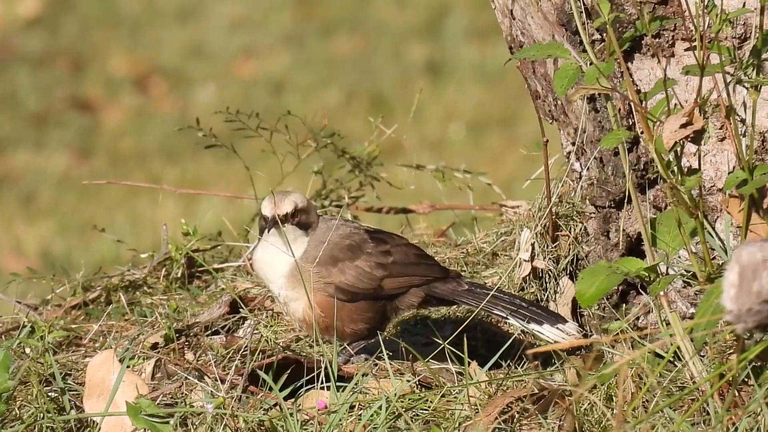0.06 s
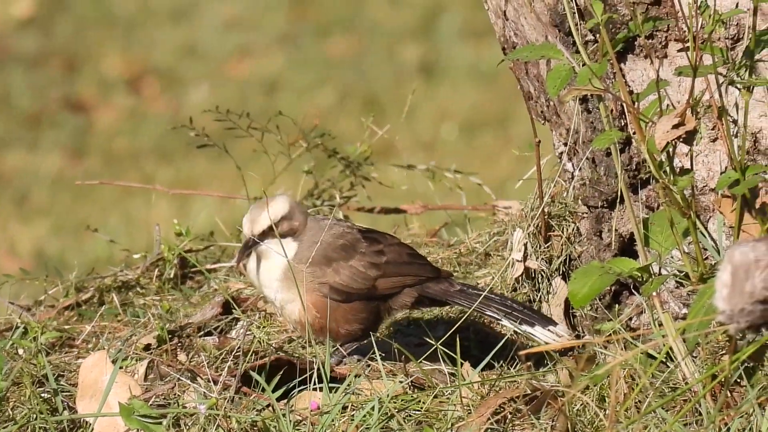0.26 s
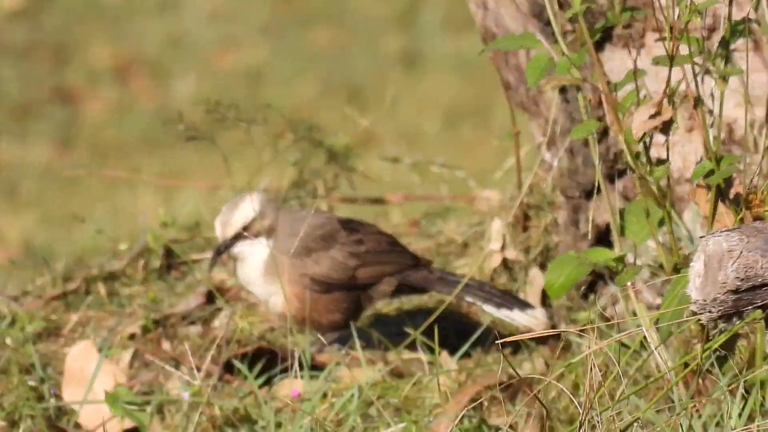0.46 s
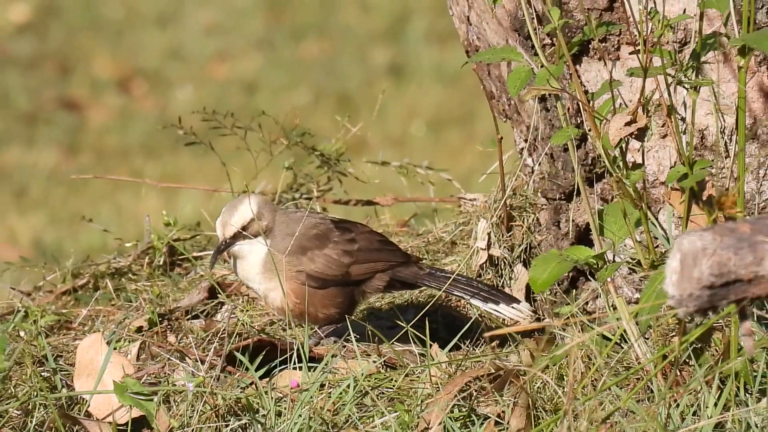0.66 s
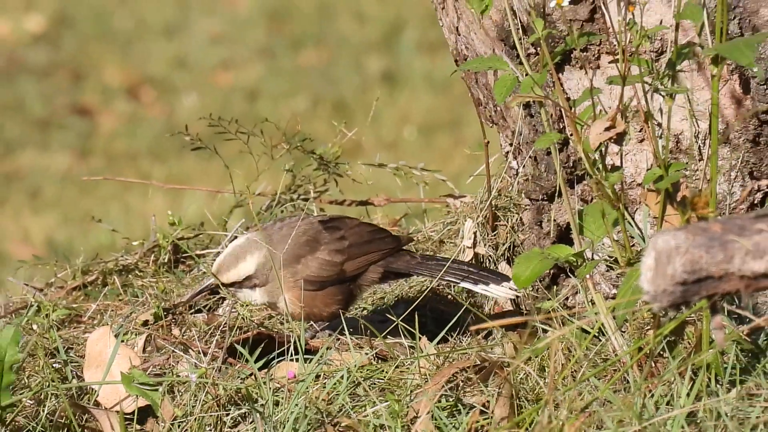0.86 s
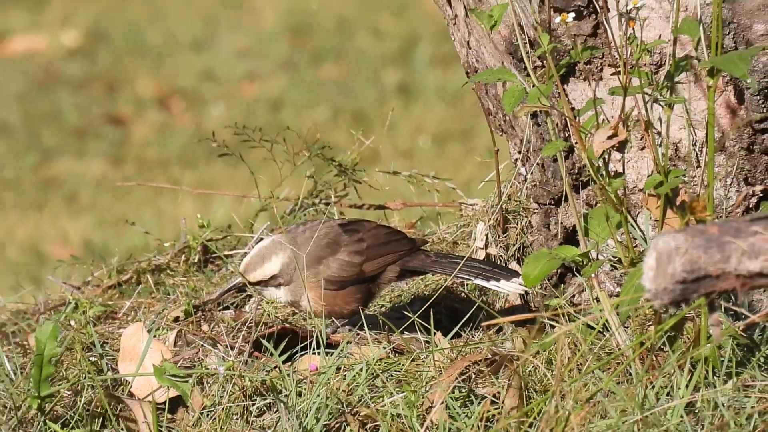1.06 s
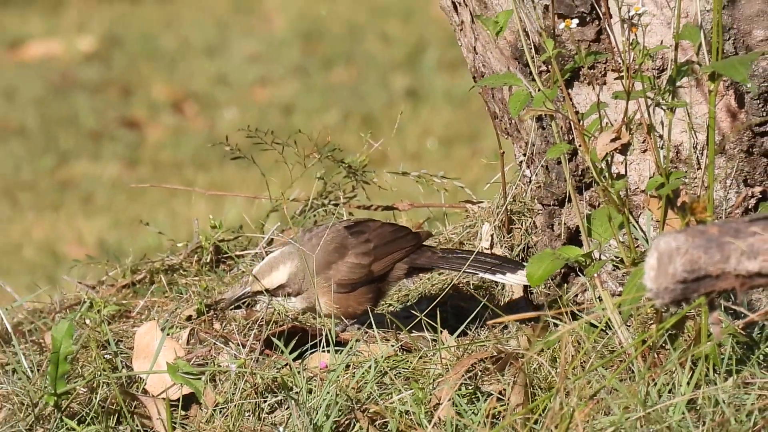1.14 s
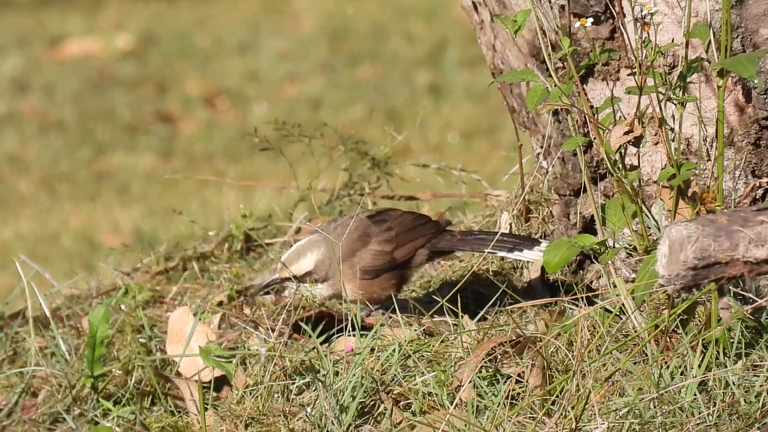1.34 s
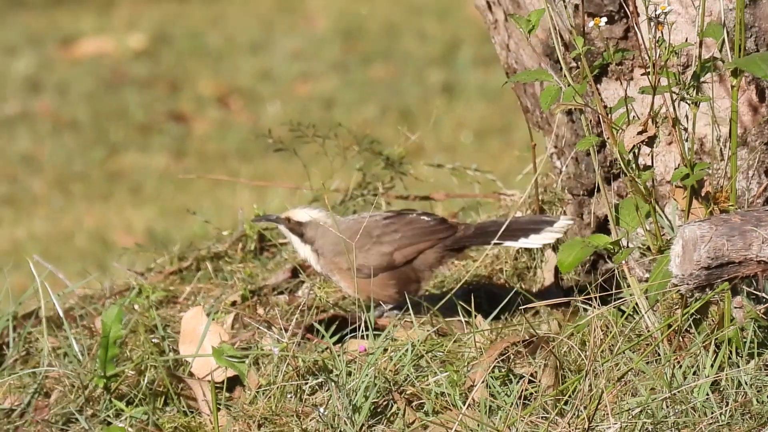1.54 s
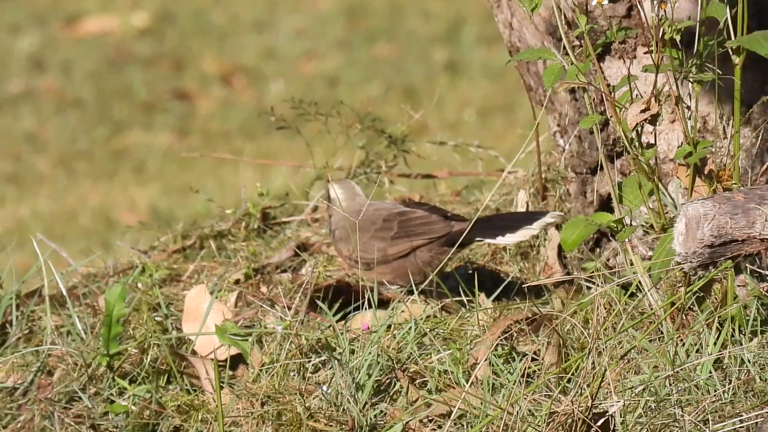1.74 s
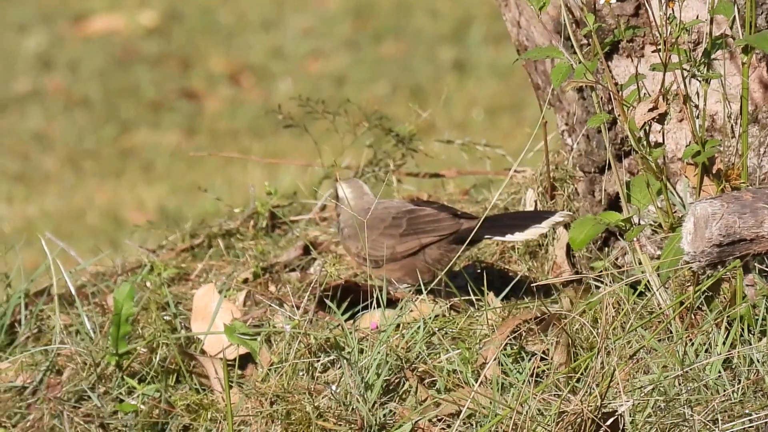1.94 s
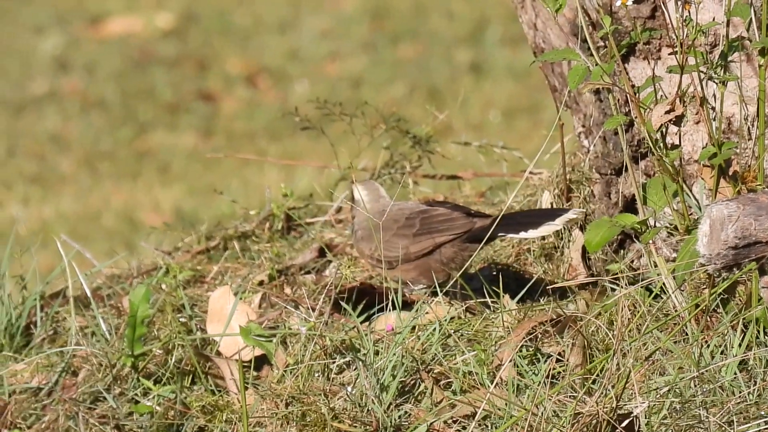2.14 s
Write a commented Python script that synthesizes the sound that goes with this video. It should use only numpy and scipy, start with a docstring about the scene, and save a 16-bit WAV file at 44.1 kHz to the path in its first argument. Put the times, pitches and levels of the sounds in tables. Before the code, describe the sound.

Four shrill two-toned bird calls, each ending in a sharp downward chip, in open grassy surroundings

```python
"""A bird in the grass, to the right of the microphone, gives four piercing calls with both sides of its syrinx:
a high and a low whistle that mix into sum and difference tones, each call ending in a quick downward chip.
The surroundings ring on in scattered noise echoes. Farther birds chirp faintly as short gliding tones and
a far insect buzzes as pulsed band noise, over the shaped-noise drone of distant traffic."""
import sys
import numpy as np
from scipy import signal
from scipy.fft import rfft, irfft, next_fast_len
from scipy.io import wavfile
from scipy.ndimage import map_coordinates

SR = 44100
rng = np.random.default_rng(int(sys.argv[2]) if len(sys.argv) > 2 else 0)


def wrap_up_sound(samples):
    """Save the sound to the file named by the first command line argument, as 16-bit audio."""
    columns = np.atleast_2d(samples).T
    # keep every value between -1 and 1, then stretch to whole-number steps
    tamed = np.clip(columns, -1, 1)
    steps = np.round(tamed * 32767).astype(np.int16)
    wavfile.write(sys.argv[1], SR, steps)


N = 97020
T = np.arange(N) / SR  # time of each sample, s
DULL_HZ = 10000  # treble corner of the echoes and of the chip's rasp


def amp(db):
    """Decibels to amplitude."""
    return 10 ** (np.asarray(db) / 20)


def unit(x):
    """x scaled to an RMS of one."""
    return x / np.sqrt(np.mean(x ** 2) + 1e-20)


def along(points, hz):
    """(Hz, value) points read off on a log frequency axis."""
    f, v = np.transpose(points)
    return np.interp(np.log(hz + 1), np.log(f + 1), v)


def curves(rows):
    """One value per sample for each column after the time."""
    s, *cols = np.transpose(rows)
    return [np.interp(T, s, c) for c in cols]


def wobble(rate):
    """A smooth random curve, rate knots a second."""
    knots = rng.standard_normal(int(N * rate / SR) + 4)
    return map_coordinates(knots, [np.arange(N) * rate / SR])


def filtered(x, response):
    """x times a response of frequency."""
    m = next_fast_len(N + SR // 2)
    return irfft(rfft(x, m) * response(np.fft.rfftfreq(m, 1 / SR)), m)[..., :N]


def gate(start, end, fade):
    """Opens at start, is shut at end; fade in seconds."""
    return np.clip(np.minimum(T - start, end - T) / fade, 0, 1)


def placed(x, pan_db):
    """Mono to stereo by left-right level; the mean of both sides keeps the amplitude."""
    sides = amp(np.array([pan_db / 2, -pan_db / 2]))
    return x * sides / sides.mean(0)


def turn(hz):
    """Running phase of a pitch curve."""
    return 2 * np.pi * np.cumsum(hz) / SR


def echoed(x, tail, db):
    """x (one row) through a stereo echo tail scaled to unit energy on the left, at a level in dB."""
    return amp(db) * signal.fftconvolve(x, tail / np.linalg.norm(tail[0]), axes=1)[:, :N]


def mixed_tones(high_phase, low_phase, since, beat, high_on, both_on):
    """Multiples, sums and differences of the two whistles; each tone wavers and flutters."""
    # Each row: times the high pitch, times the low pitch.
    orders = [(2, 0), (1, 1), (0, 2), (2, -1), (0, 3), (1, 2), (3, -1), (2, 1), (1, 3), (3, 0), (2, 2)]
    # Each row, in the same order: starting level in dB before the call's own offset, change in dB per s.
    tone_levels = [(-46, -118), (-47.5, -63), (-51.5, -15), (-54.5, -36), (-66, 44), (-61.5, 6), (-62, -36),
                   (-61, -39), (-81, -10), (-69, -200), (-77, -44)]
    waver_db, waver_rate = 3.5, 70  # depth, knots per s
    deeper_db = 8  # the mixed tones flutter deeper than the whistle
    total = np.zeros(N)
    for (m, n), (level, slope) in zip(orders, tone_levels):
        level_db = level + slope * since + waver_db * wobble(waver_rate)
        on = both_on if n else high_on
        total += on * amp(level_db) * np.sin(m * high_phase + n * low_phase)
    return (1 + amp(deeper_db) * beat) * total


def breath(since, on, air_db):
    """Air noise through the syrinx, opening with a short puff."""
    # Each row: frequency in Hz, relative noise density in dB per Hz.
    air_shape = [(1880, -51), (3200, -17), (4060, -15.5), (4790, 3), (5320, -15), (12500, -29.5),
                 (15500, -70)]
    puff_db, puff_s = 10, 0.007  # extra level at the start, decay time
    noise = rng.standard_normal(N)
    noise = unit(filtered(noise, lambda f: amp(along(air_shape, f)) * (f > 2200)))
    return on * amp(air_db + puff_db * np.exp(-since / puff_s)) * noise


def closing_chip(high_phase, hz, start, end, start_db, chip_db):
    """The closing fall of the high voice: it crackles, splinters in pitch and swells at the throat resonance."""
    peak_share, end_db = .66, -7  # where in the fall its level curve peaks; end level relative to that peak
    rough_db, splinter_hz = 4.5, 180
    throat_hz, throat_wide_hz, throat_db = 2950, 600, 7
    overtone_db, rasp_db = -22, -18
    peak = start + (end - start) * peak_share
    swell_db = np.interp(T, [start, peak, end], [start_db, chip_db, chip_db + end_db])
    level = gate(start - .003, end, 0.0024) * amp(swell_db + rough_db * wobble(500))
    fall = high_phase + turn(splinter_hz * wobble(900))
    throat = amp(throat_db * np.exp(-((hz - throat_hz) / throat_wide_hz) ** 2))
    rasp = rng.standard_normal(N)
    rasp = unit(filtered(rasp, lambda f: (f > 2200) / (1 + (f / DULL_HZ) ** 8)))
    return level * (throat * np.sin(fall) + amp(overtone_db) * np.sin(2 * fall) + amp(rasp_db) * rasp)


def chip_smeared(chip):
    """The chip smears: sparse spiky echoes that die quickly."""
    t60_s = .06
    t = T[:SR // 10]
    tail = rng.standard_normal((2, len(t))) ** 3 * amp(-60 * t / t60_s)  # cubing makes a few echoes stand out
    return echoed(chip[None], tail, -2)


def glides_smeared(glides):
    """Glides and air smear in dense near echoes with a weaker long wash."""
    near_t60_s, wash_t60_s, wash_db = 0.13, 1, -14
    t = T[:SR // 2]
    decay = amp(-60 * t / near_t60_s) + amp(wash_db - 60 * t / wash_t60_s)
    tail = rng.standard_normal((2, len(t))) * decay
    return echoed(glides[None], tail, 2.5)


def call(high, low, voice):
    """One call: two whistles, their mixed tones, air noise, the closing chip and its near echoes."""
    onset_s, onset_hz, onset_db = 0.00536, 3600, -9  # swoop into the first point; the overshoot adds to its pitch
    settle_s = .009  # the overshoot dies away
    catch_s, catch_hz, catch_db = 0.0133, 2466, -39  # the low voice first catches at a lower pitch
    chip_s, chip_hz = .027, 1980  # length and end pitch of the closing fall
    flutter_hz = 387  # a fast flutter puts sidebands on the high voice
    shake_db = 1.2  # both whistles shake in level
    caller_pan_db = -6  # left over right: the caller is to the right

    early_hz, late_hz, over_hz, chip_db, mix_db, air_db, flutter_db = voice
    (first, first_db, first_pan), (last, last_db, _) = high[0], high[-1]
    start, end = first - onset_s, last + chip_s
    since = np.clip(T - first, 0, 1)
    hz = np.interp(T, [start, first, last, end], [onset_hz, early_hz, late_hz, chip_hz])
    hz = hz + over_hz * np.exp(-(since / settle_s) ** 2.13)
    high_db, pan_db = curves([(start, first_db + onset_db, first_pan), *high])
    low_start = low[0][0]
    catch = [(low_start - u * catch_s, catch_hz, catch_db) for u in (1, 1 / 3)]
    low_hz, low_db = curves([*catch, *low])
    high_phase = turn(hz + 6 * wobble(122.3))
    low_phase = turn(low_hz + 5 * wobble(120))
    high_on = gate(start, end, 0.0016)
    both_on = gate(low_start - catch_s, low[-1][0], 0.004)
    beat = 2 * amp(flutter_db) * np.sin(2 * np.pi * flutter_hz * T)

    high_level = gate(start, last, 0.0042) * amp(high_db + shake_db * wobble(90.4))
    whistle = high_level * (1 + beat) * np.sin(high_phase)
    low_whistle = both_on * amp(low_db + shake_db * wobble(70.8)) * np.sin(low_phase)
    mixed = amp(mix_db) * mixed_tones(high_phase, low_phase, since, beat, high_on, both_on)
    air = breath(since, high_on, air_db)
    chip = closing_chip(high_phase, hz, last, end, last_db, chip_db)

    rest = placed(low_whistle + mixed + air + chip, np.full(N, caller_pan_db))
    glides = chip + air + whistle * np.exp(-since / settle_s)
    # the root of two turns sine levels into RMS levels
    return np.sqrt(2) * (placed(whistle, pan_db) + rest + glides_smeared(glides) + chip_smeared(chip))


def outdoors(x):
    """Scattered, clumped echoes of the surroundings; each frequency dies at its own speed."""
    # Each row: frequency in Hz, time to fall 60 dB in seconds.
    ring = [(2000, .65), (4700, .8), (8000, .4), (13000, .15)]
    first_echo_s, clump_db, wet_db = .006, 3.5, -9.5
    hz, t, z = signal.stft(rng.standard_normal((2, SR)), SR, nperseg=256)
    decay = amp(-60 * t / along(ring, hz)[:, None])
    tail = signal.istft(z * decay, SR, nperseg=256)[1]
    tail = tail * amp(clump_db * wobble(29.7)[:tail.shape[1]])
    late = np.pad(x.mean(0), (round(first_echo_s * SR), 0))
    late = filtered(late, lambda f: 1 / (1 + (f / DULL_HZ) ** 2))
    return echoed(late[None], tail, wet_db)


def far_birds():
    """Short, slightly rough gliding whistles and one cheep with overtones that arches and drops."""
    # Each row: start in seconds, length in seconds, from Hz, to Hz, level in dB before its shake.
    chirps = [(0.095, 0.017, 4060, 3570, -51.5), (0.139, 0.017, 4250, 3610, -46),
              (0.191, 0.017, 4200, 3600, -47.5), (0.246, 0.011, 4200, 3700, -49),
              (0.112, 0.14, 2810, 2750, -51), (0.924, 0.015, 4220, 3650, -45),
              (.975, .014, 4170, 3660, -47), (1.107, 0.021, 3650, 3490, -42),
              (1.312, 0.024, 3650, 3430, -45), (1.767, 0.014, 4240, 3600, -46),
              (1.814, 0.023, 4250, 3750, -46), (1.863, 0.02, 4270, 3900, -48),
              (1.791, 0.067, 2680, 2780, -49), (2.037, 0.014, 3880, 3450, -55.5),
              (2.086, 0.015, 3970, 3430, -53.5), (2.142, 0.015, 3930, 3440, -53.5),
              (2.1, 0.066, 1665, 1612, -49)]
    # Each row: time in seconds, base pitch in Hz, level in dB before the tone's own level.
    cheep = [(1.897, 1480, -54), (1.907, 1630, -48), (1.922, 1680, -44), (1.932, 1380, -42)]
    # Each row: multiple of the base pitch, level in dB.
    cheep_tones = [(2, 0), (3, 0), (4, -14)]
    out = np.zeros(N)
    shake, quaver = amp(3 * wobble(300)), turn(80 * wobble(400))  # rough level, rough pitch
    for s, length, from_hz, to_hz, db in chirps:
        glide = turn(from_hz + (to_hz - from_hz) * np.clip((T - s) / length, 0, 1))
        level = amp(db) * shake * gate(s, s + length, length / 3)
        out += np.sqrt(2) * level * np.sin(glide + quaver)
    hz, db = curves(cheep)
    tones = sum(amp(db + level) * np.sin(k * turn(hz)) for k, level in cheep_tones)
    out += np.sqrt(2) * gate(cheep[0][0], cheep[-1][0], 0.0017) * tones
    return np.array([out, out])


def insect():
    """A far insect's faint buzz: a band of noise pulsing at a slightly unsteady rate."""
    centre_hz, wide_hz, pulse_hz, buzz_db, end_s = 2360, 216, 120, -55, 1.62
    noise = rng.standard_normal(N)
    band = unit(filtered(noise, lambda f: np.exp(-((f - centre_hz) / wide_hz) ** 2)))
    pulses = (1 + np.sin(turn(pulse_hz + 3 * wobble(10.84)))) ** 2 / 2
    return amp(buzz_db) * gate(-1, end_s, 0.18) * pulses * band


def traffic():
    """Distant traffic as shaped noise: a nearly central drone, lumpy rumble below it and faint hiss above."""
    # Each row: time in seconds, gain of the drone in dB before its wavering.
    drone = [(0.0, -36.5), (1.74, -38), (2.03, -36.5), (2.2, -39)]
    # Each row: frequency in Hz, relative noise density in dB per Hz.
    spectrum = [(40, -89), (80, -32), (129, -36.5), (183, -21), (510, -8.5), (759, 1.5), (1130, -4.5),
                (2060, -22), (3150, -21.5), (3840, -16), (4460, -24.5), (6820, -26), (15500, -65.5)]
    # Each row: frequency in Hz, left-right likeness (1 same, -1 opposite).
    likeness = [(60, 1), (240, 0.98), (950, 0.96), (3770, 0.24), (15000, -0.69)]
    lump_db, thinning_db_per_s = 4.5, -1.5  # the rumble comes in lumps; the hiss thins out

    def spread(hz):
        """Spectrum of the shared and of the opposed part of both sides."""
        angle = np.arccos(np.clip(along(likeness, hz), -1, 1)) / 2
        return amp(along(spectrum, hz)) * [np.cos(angle), np.sin(angle)]

    mid, opposed = filtered(rng.standard_normal((2, N)), spread)
    pair = unit(np.array([mid + opposed, mid - opposed]))
    rumble = filtered(pair, lambda hz: hz < 280)
    hiss = filtered(pair, lambda hz: hz > 1900)
    drone_db, = curves(drone)
    middle = amp(drone_db + 2.1 * wobble(5.0)) * (pair - rumble - hiss)
    low = amp(-30.5 + lump_db * wobble(8.65)) * rumble
    return middle + low + amp(-38.5 + thinning_db_per_s * T) * hiss


def scene():
    """The four calls and the far birds with their echoes, over traffic and insect."""
    # High voice, one list per call. Each row: time in seconds, level in dB, left-right difference in dB.
    high = [
        [(0.221, -25, -1), (0.231, -19.5, 0), (0.257, -39, 8), (0.283, -27.5, 2), (0.313, -47, -7),
         (0.327, -26, -6), (0.337, -38, -9), (0.346, -25.5, -18), (0.366, -40.5, -17), (0.377, -31, -11),
         (0.395, -42, -5), (0.405, -31, -1.5)],
        [(0.514, -21, 7), (0.542, -23.5, -10), (0.568, -17.5, -9.5), (0.66, -29, -20), (0.672, -54, -8),
         (0.703, -40, -5)],
        [(0.836, -25.5, 3), (0.854, -29, -6), (0.872, -19, -10), (0.898, -20, -12), (0.934, -33.5, -1.5),
         (0.98, -21, -8), (0.996, -44.5, -16), (1.024, -37, 5), (1.032, -40.5, 0.5)],
        [(1.219, -26.5, 6), (1.247, -19, -10.5), (1.285, -16.5, -8.5), (1.319, -27.5, -22), (1.347, -30.5, 6),
         (1.373, -41, -15), (1.393, -26, -1), (1.417, -35.5, -3)],
    ]
    # Low voice, one list per call. Each row: time in seconds, pitch in Hz, level in dB.
    low = [
        [(0.228, 2818, -45), (0.366, 2785, -36.5), (0.386, 2800, -46.5), (0.415, 2810, -31)],
        [(0.522, 2920, -45), (0.576, 2888, -33), (0.712, 2780, -37.5)],
        [(0.844, 2900, -38), (0.864, 2918, -40.5), (0.926, 2860, -31), (1.04, 2756, -38)],
        [(1.227, 2790, -42), (1.249, 2884, -36.5), (1.361, 2840, -30.5), (1.425, 2710, -42.5)],
    ]
    # Each row, one per call: high pitch early in Hz, late in Hz, overshoot on top in Hz, chip level in dB,
    # mixed tones' offset in dB, air level in dB, flutter sidebands in dB relative to the high whistle.
    voices = [(4767, 4742, 560, -30.5, 1.5, -46.5, -15.5), (4700, 4708, 270, -31, 1.5, -50.5, -20),
              (4724, 4665, 280, -33, 2, -46, -23), (4682, 4620, 500, -32, 3.5, -51.5, -27.5)]
    sounds = [call(*c) for c in zip(high, low, voices)] + [far_birds()]
    return sum(x + outdoors(x) for x in sounds) + traffic() + insect()


def record(dry):
    """The microphone chain keeps nothing above its band limit of 15700 Hz."""
    return filtered(dry, lambda hz: hz < 15700)


dry = scene()
out = record(dry)
wrap_up_sound(out)
```